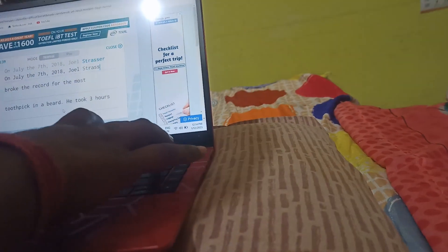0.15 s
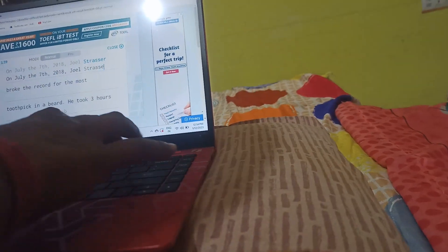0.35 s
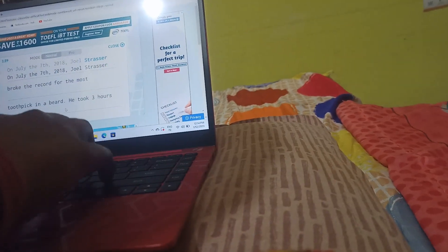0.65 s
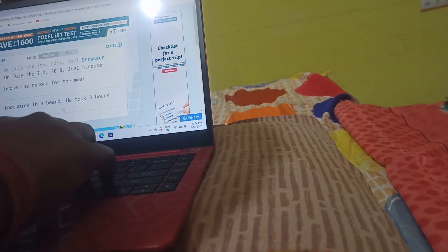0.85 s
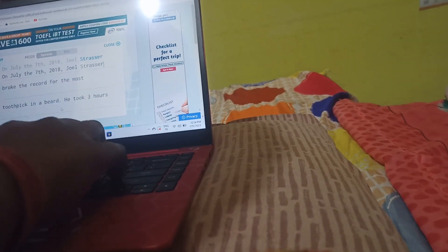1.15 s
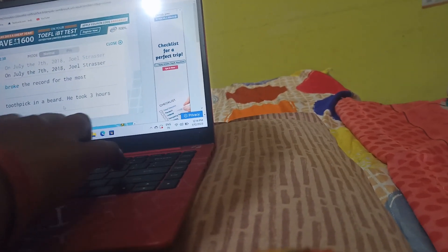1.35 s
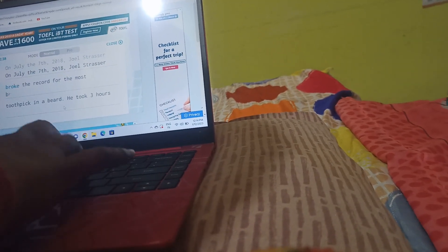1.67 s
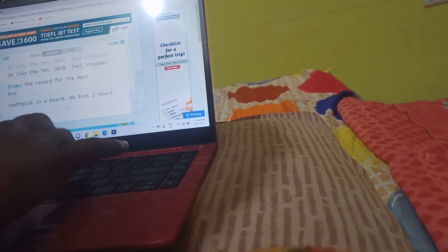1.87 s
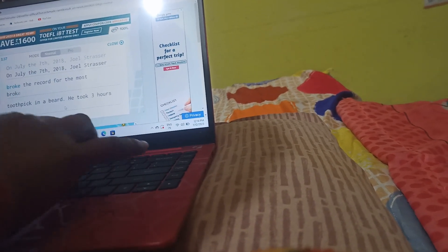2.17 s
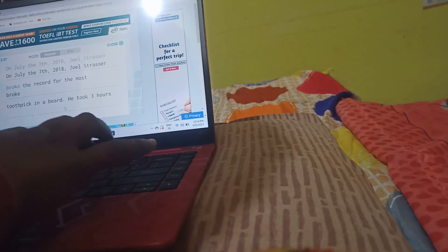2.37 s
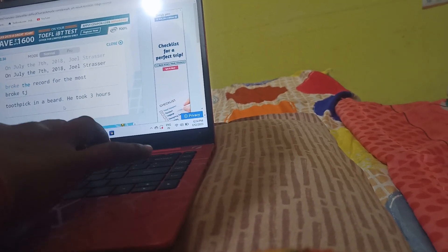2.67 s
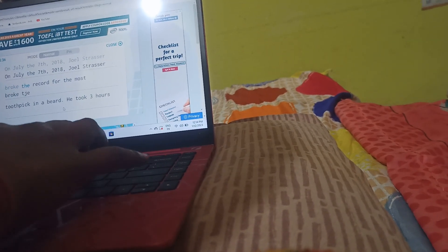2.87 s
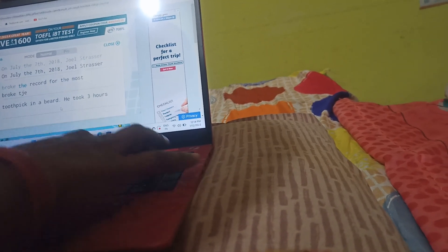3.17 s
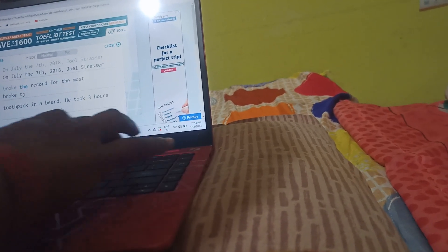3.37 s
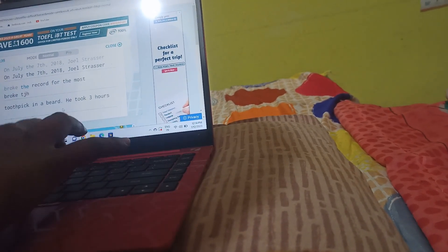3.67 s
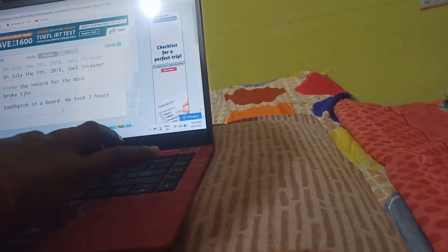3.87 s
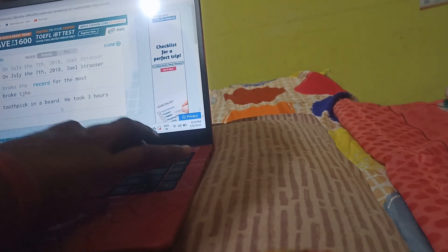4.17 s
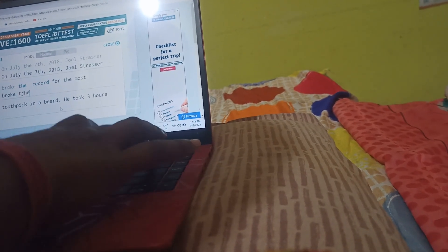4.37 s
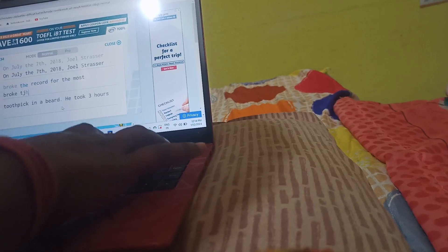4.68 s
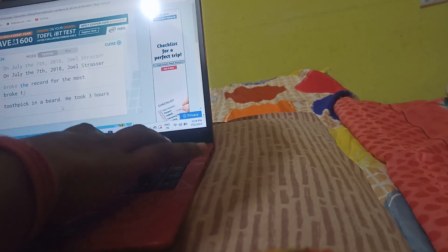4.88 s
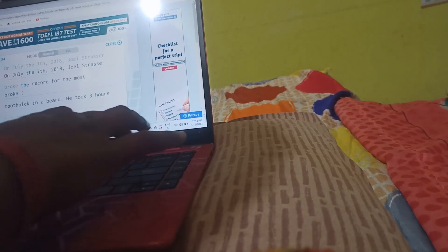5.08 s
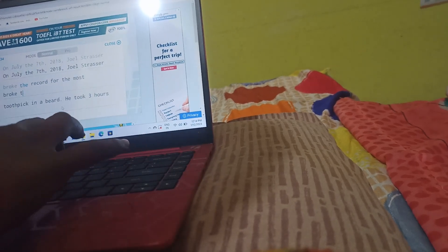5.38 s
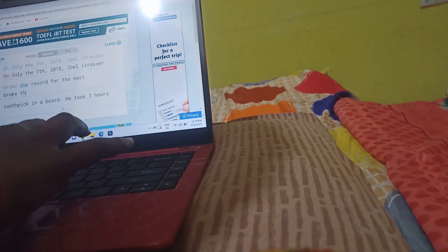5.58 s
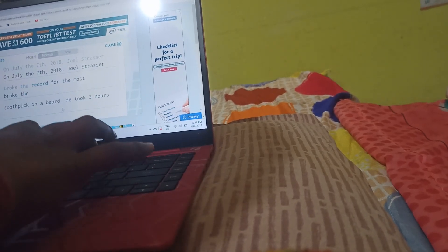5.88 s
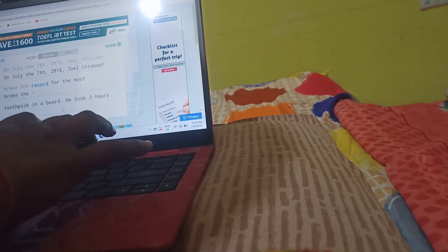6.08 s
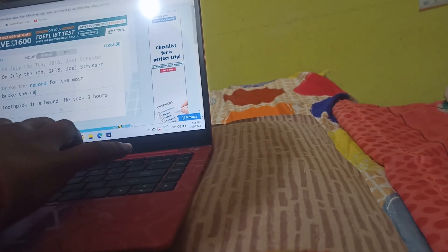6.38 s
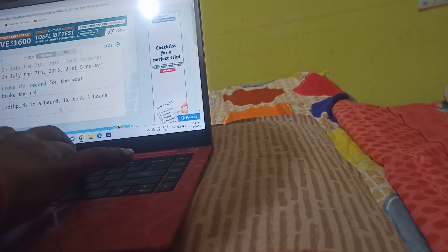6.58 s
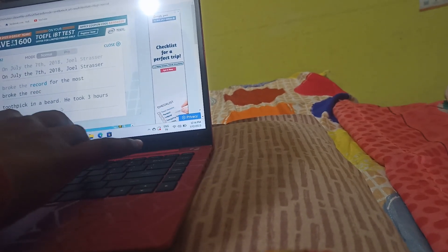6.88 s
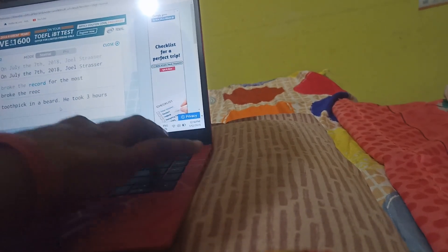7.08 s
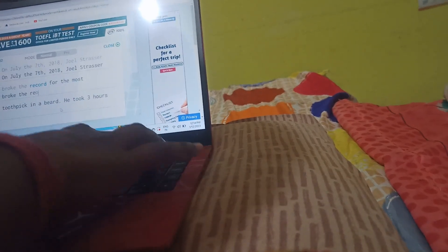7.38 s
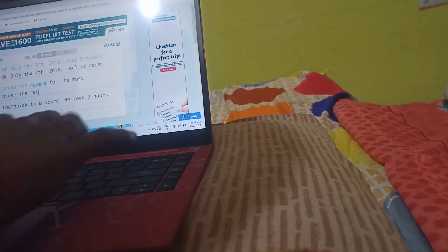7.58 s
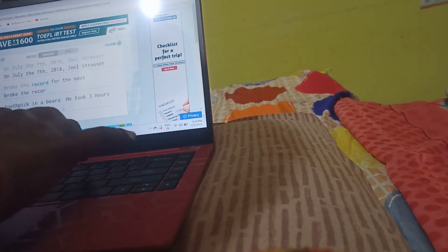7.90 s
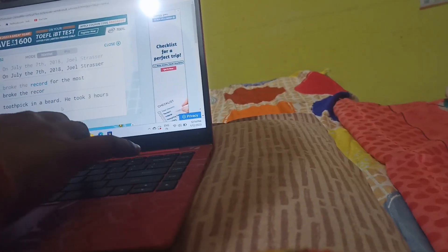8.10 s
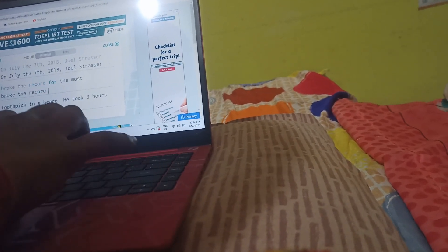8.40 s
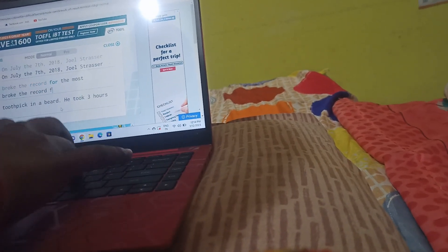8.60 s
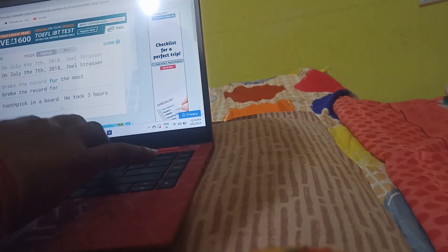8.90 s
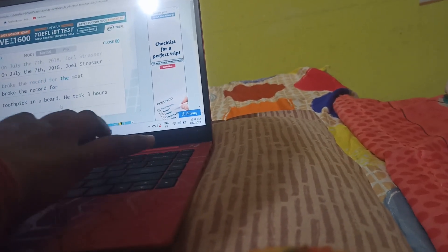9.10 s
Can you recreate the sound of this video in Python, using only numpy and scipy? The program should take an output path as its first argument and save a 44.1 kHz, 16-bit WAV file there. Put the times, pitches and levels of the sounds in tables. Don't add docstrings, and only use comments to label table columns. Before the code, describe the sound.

At 0 s a motor's buzz is just dying away as a key taps. Sparse light clicks near 0.5 s sit in a gated room murmur with a very faint fan tone. At about 0.9 s tiny sharp cracks release a close vibration: a low hum near 210 Hz with brushy, hissing treble, rising quickly, sagging slightly, then cut at 1.9 s and coasting down by 2.2 s with a small catch. Soft laptop keys, plastic click over dull bed thud, cluster at 2.2-2.7 s. The buzz repeats at 2.9-3.9, 4.9-5.9 and 6.9-7.9 s, each with a short run-down; the third start crackles hardest and runs slightly higher. Typing continues under the motor and in the gaps around 4.3-4.7, 6.2-6.7 and 8.1-8.8 s. A last buzz begins at 8.9 s, cut off by the end. Dry, close, nearly mono.

```python
import sys
import numpy as np
from scipy import signal
from scipy.fft import rfft, irfft, next_fast_len
from scipy.io import wavfile
from scipy.ndimage import uniform_filter1d

SR = 44100
rng = np.random.default_rng(int(sys.argv[2]) if len(sys.argv) > 2 else 0)


def volts(x):
    e = np.asarray(x, float) / 20
    return 10 ** e


def wav_out(sig):
    wavfile.write(sys.argv[1], SR, np.round(np.clip(np.atleast_2d(sig).T, -1, 1) * 32767).astype(np.int16))


N = 407925

# f/Hz, level/dB per Hz
ROOM_COLOUR = [(15, -72), (25, -21), (131, -1), (427, -15), (529, -8.5), (691, -15.5), (879, -26.5),
               (1720, -28), (2070, -31), (4150, -33.5), (5570, -33.5), (6900, -46.5), (15000, -41)]
# t/s, share/0-1
GATE_IN_PAUSES = [(0.0, 1), (.13, 0.75), (.5, 0.38), (.8, 0.43), (.9, 0.38), (2.2, 0.76), (2.55, 0.1),
                  (2.78, 0.57), (2.9, 0.26), (4.12, 0.52), (4.3, 0), (4.43, 0.26), (4.52, .75),
                  (4.85, 0.59), (6.25, 0.65), (6.88, 0.28), (8.2, 0.58), (8.9, 0.3)]
# t after power-on/s, share/0-1
GATE_IN_RUNS = [
    (.03, 0.01),
    (.1, 0.93),
    (.22, 0.88),
    (.75, 0.94),
    (1.0, 1.2),
    (1.14, 0.98),
    (1.24, 0.03),
]
# from t/s, to t/s, f/Hz, level/dB
FAN_LINES = [
    (0.0, .85, 1130, -87),
    (0.0, .7, 1700, -86),
    (0.0, .8, 2260, -87),
    (0.1, .8, 3400, -91),
    (.35, .6, 680, -80),
    (4.55, 4.85, 690, -73),
    (4.6, 4.75, 540, -74),
    (4.7, 4.9, 2360, -86),
    (7.6, 8.9, 680, -78),
]
# t/s, peak/dB, thud/dB, bright/dB, tail/dB
KEYS_IN_PAUSES = [(0.003, -37, -7, -5, -12), (0.474, -60.5, -27, -12, -9), (0.583, -62, -9, -23, -7),
                  (2.165, -36.5, 3, -15, -10), (2.315, -49.5, -20, -9, -12), (2.409, -61, 1, -11, -8),
                  (2.54, -52, -18, -16, -13), (2.611, -67, -20, -28, -15), (2.686, -41, 3, -14, -5.5),
                  (4.301, -53.5, -13, -10, -11.5), (4.498, -54.5, -2.5, -6, -29),
                  (4.698, -53, -3, -9.5, -29), (6.222, -73, 15, -16, -17), (6.261, -50.5, 1.5, -17, -11.5),
                  (6.498, -50.5, 2.5, -10.5, -7), (6.601, -48, -9, -12, -15), (6.7, -64.5, 13, -32, -15),
                  (8.144, -45.5, 3.5, -8.5, -8.5), (8.323, -50, 3.5, -12.5, -13),
                  (8.481, -58.5, -3, -10, -10), (8.616, -47, -33, -10.5, -12.5), (8.726, -65, -2, -13, -18),
                  (8.76, -57.5, -5, -9, -8)]
# t/s, peak/dB, thud/dB, bright/dB, tail/dB
KEYS_UNDER_MOTOR = [(1.209, -37.5, -4, -25, -10), (1.542, -38.5, -3, -29, -8),
                    (1.683, -44.5, -8, -25.5, -12), (2.022, -39, -21, -39, -13.5),
                    (3.277, -32.5, -32, -24, -15), (3.629, -40, -8, -28.5, -6),
                    (3.771, -43.5, -1, -31, -13), (3.949, -38, -14, -4, -26), (4.013, -51.5, -13, -20, -5),
                    (5.536, -38, -3.5, -27, -23), (5.715, -51, -19, -26, -19), (5.849, -40, 3, -25, -34),
                    (7.209, -33, -5, -31, -16.5), (7.397, -32.5, -26, -28.5, -11.5),
                    (7.726, -38, -13, -25, -20), (9.04, -34.5, -1, -24, -2.5)]
# f/Hz, level/dB per Hz
KEY_COLOUR = [(150, -22), (250, 1.5), (882, -19.5), (1270, -24), (1590, -21), (1790, -20.5), (5040, -24),
              (7510, -34), (13300, -24.5), (15500, -47)]
# t/s, peak/dB
TOUCHES = [
    (.288, -66),
    (.41, -72),
    (.80, -72),
    (4.477, -74),
]
# power-on t/s, full speed/Hz early, midway and late as the supply sags
STARTS = [
    (-1.103, 214.0, 212.0, 211.0),
    (0.897, 214.8, 211.6, 210.4),
    (2.902, 214.4, 212.7, 211.4),
    (4.899, 219.3, 216.2, 214.3),
    (6.9, 217.4, 215.1, 214.0),
    (8.905, 218.0, 216.0, 215.0),
]
REST_TURNS = [.0, .15, -.12, .5, .33, -0.09]
# t/s, peak/dB
SLIPS = [(0.912, -31.5), (0.9205, -24), (0.9271, -17.5), (0.9485, -30), (2.907, -31), (2.9129, -29.5),
         (2.9177, -29.5), (2.9204, -21), (2.9259, -14.5), (2.929, -29.5), (2.9364, -33), (2.9454, -31.5),
         (4.9122, -16), (4.9177, -18), (4.9212, -20.5), (4.9255, -13), (4.9307, -17), (4.9368, -19),
         (4.9393, -33.5), (6.9086, -39.5), (6.9145, -32.5), (6.92, -36), (6.9226, -26), (6.9277, -16.5),
         (6.9311, -32), (6.9363, -33), (8.9105, -40), (8.923, -29), (8.9302, -33), (8.9384, -19.0)]
# t/s, peak/dB
STOPS = [
    (2.112, -40.5),
    (4.1137, -43.5),
    (6.128, -41),
    (8.1448, -57),
]
# f/Hz, level/dB
CASE = [(300, -22), (1200, -20), (1500, 2), (1900, 7), (2500, 0.1), (3600, -7), (5200, 2), (6800, 0.1),
        (7600, -6), (9000, 0.1), (12000, 2), (16000, -4)]
# f/Hz, level/dB per Hz
HISS = [(900, -26), (1400, -12), (1900, -6), (2600, -15), (3800, -10.5), (5300, -2), (6600, -11.5),
        (7600, -14), (8700, -5.5), (10500, -4.5), (12300, 3), (13800, -2.5), (14400, -2.5), (15800, -8.5)]
# f/Hz, width/Hz, level/dB
TICK_RINGS = [
    (1890, 280, -20),
    (3520, 500, -16),
    (5840, 1700, -1),
    (11500, 5300, -3),
]
TURN_DB = [-48, -48, -49, -46, -46, -35, -27, -37, -45, -40, -27, -33, -41, -34, -39, -46, -39, -40, -37,
           -36, -33, -35, -28, -28, -30, -30, -35, -32, -36, -30, -31, -36, -36, -47, -40, -28, -31, -38,
           -27, -35, -25, -26, -24, -37, -38, -29, -36, -26, -26, -39, -28, -29, -20, -23, -27, -26, -32,
           -23, -32, -23, -30, -33, -24, -39, -41, -44, -33, -37, -36, -37, -48]
# from t/s, to t/s, level/dB
SPLITS = [
    (3.003, 3.22, -45),
    (5.118, 5.178, -41),
    (7.163, 7.192, -42),
    (9.132, 9.172, -44),
]


def evened(x):
    return x / np.sqrt(np.mean(x ** 2) + 1e-20)


def read(points, hz):
    f, value = np.transpose(points)
    return np.interp(np.log(hz + 1), np.log(f + 1), value)


def add(mix, s, sound):
    at = round(s * SR)
    sound = sound[max(-at, 0):]
    part = mix[max(at, 0):][:len(sound)]
    part += sound[:len(part)]


def coloured(x, points, lo_hz, hi_hz):
    size = next_fast_len(len(x))
    hz = np.fft.rfftfreq(size, 1 / SR)
    edges = 1 / np.sqrt((1 + (lo_hz / (hz + 1)) ** 12) * (1 + (hz / hi_hz) ** 12))
    return evened(irfft(rfft(x, size) * volts(read(points, hz)) * edges, size)[:len(x)])


def drift(count, size):
    return evened(uniform_filter1d(uniform_filter1d(rng.standard_normal(count), size), size))


def gate(t):
    runs = sum(np.interp(t - start, *np.transpose(GATE_IN_RUNS)) for start, *_ in STARTS)
    share_per_db, quiet_db, hold_s = 0.0083, -65.5, 0.027
    keys = np.zeros(len(t))
    for s, db, *_ in KEYS_IN_PAUSES + KEYS_UNDER_MOTOR:
        keys += share_per_db * max(db - quiet_db, 0) * (t > s) * np.exp(-abs(t - s) / hold_s)
    return np.maximum(np.interp(t, *np.transpose(GATE_IN_PAUSES)), runs) + uniform_filter1d(keys, size=5)


def room():
    hz, frames, z = signal.stft(rng.standard_normal(N), SR, nperseg=1024)
    patches = uniform_filter1d(rng.standard_normal(z.shape), size=5, axis=0)
    patches = evened(uniform_filter1d(patches, size=4, axis=1))
    noise = signal.istft(z * volts(3.4 * patches), SR, nperseg=1024)[1][:N]
    coarse = np.arange(0, N / SR + .01, .002)
    share = np.interp(np.arange(N) / SR, coarse, gate(coarse))
    layers = (-82, -58, 45, 260), (-87, -67, 260, 900), (-90.5, -68.5, 900, 21000)
    return sum(volts(shut + (wide - shut) * share) * coloured(noise, ROOM_COLOUR, lo, hi)
               for shut, wide, lo, hi in layers)


def fan_line(start, end, hz, db):
    t = np.arange(start, end, 1 / SR)
    tone = np.sin(2 * np.pi * hz * t + 1.4 * drift(len(t), size=1500))
    return start, volts(db + 3.0 * drift(len(t), size=2500)) * tone * signal.windows.tukey(len(t), .3)


def key_snap(db):
    t, peak_s, ring_hz = np.arange(600) / SR, .0009, 5200
    ring = np.sin(2 * np.pi * ring_hz * rng.uniform(0.97, 1.04) * t)
    return volts(db) * (t / peak_s) * np.exp(1 - t / peak_s) * ring


def key_stroke(db, thud_db, bright_db, tail_db):
    t = np.arange(8192) / SR
    click = np.clip(t / 0.0018, 0, 1) * np.exp(-(t / 0.0064) ** 2) + 0.18 * volts(-700 * t)
    rebound = np.exp(-(t - .012) / 0.0037)
    held = 0.57 * np.exp(-t / 0.084) / (1 + (t / 0.077) ** 6)
    tail = np.clip((t - .012) / 0.0024, 0, 1) * (rebound + held)
    noise = rng.standard_normal(len(t))
    clack = coloured(noise, KEY_COLOUR, 340, 6000)
    clack = clack + volts(bright_db) * coloured(noise, KEY_COLOUR, 5700, 15500)
    air = coloured(noise, KEY_COLOUR, 1000, 6200)
    air = air + volts(bright_db + 8.5) * coloured(noise, KEY_COLOUR, 5500, 15500)
    thud = coloured(noise, ROOM_COLOUR, 86, 340) * (t / 0.01) * np.exp(1 - t / 0.0084)
    thud = thud + .5 * np.sin(2 * np.pi * 140 * t) * np.exp(-t / 0.037)
    click_part = (clack + 0.084 * air) * click
    tail_part = volts(tail_db) * (air + 0.52 * clack) * tail
    return volts(db - 9.5) * (click_part + tail_part + volts(thud_db + 4.5) * thud)


def typing(mix):
    for s, db, thud_db, bright_db, tail_db in KEYS_IN_PAUSES + KEYS_UNDER_MOTOR:
        add(mix, s, key_stroke(db, thud_db, bright_db, tail_db))
        add(mix, s, key_snap(db - 5.0 + 0.53 * thud_db))
    for s, db in TOUCHES:
        add(mix, s, key_snap(db))


def slip(db, hz, knock_db, rise_s=.0001):
    t = np.arange(200) / SR
    crack = (t / rise_s) * np.exp(1 - t / rise_s) * np.sin(2 * np.pi * hz * t)
    knock = np.exp(-t / 0.00032) * np.sin(2 * np.pi * 2800 * t)
    return volts(db) * crack + volts(knock_db) * knock


def slips():
    out, rows = np.zeros(N), list(SLIPS)
    for start, *_ in STARTS[1:]:
        rows.append((start + .0015, -46))
        for when, strength in rng.random((5, 2)):
            rows.append((start + 0.013 + 0.064 * when, -43.5 + 8.8 * (strength - .5)))
    for s, db in rows:
        a, b = rng.standard_normal(2)
        hz = 12300 - 300 * abs(a) - 40 * np.clip(-17.5 - db, 0, 15)
        add(out, s - .0002, slip(db, hz, min(-43 + 1.5 * b, db - 12.0)))
    for s, db in STOPS:
        add(out, s - .0002, slip(db - 3.0, 5500, db - 27, rise_s=0.00014))
    return out


def spin(t):
    head_start_s, spin_up_s, on_s, coast_s, friction = .004, .14, 1, .175, 0.27
    coast = (1 + friction) * np.exp(-np.maximum(t - on_s, 0) / coast_s) - friction
    up = (t + head_start_s) / spin_up_s
    return np.tanh(up + .05 * up ** 3) * np.maximum(coast, .07)


def brush_db(share, powered, full_db, up_power, coast_power, cut_db):
    power = coast_power + (up_power - coast_power) * powered
    return full_db + 20 * np.log10(share) * power + cut_db * (1 - powered)


def turn_pattern(angle, hz, powered, middle_hz, phases):
    low, high = np.zeros((2, len(angle)), np.float32)
    coarse = np.arange(0, len(angle), 32)
    turn = step = np.exp(1j * angle).astype(np.complex64)
    for k, (db, phase) in enumerate(zip(TURN_DB, phases), 2):
        turn = turn * step
        change_db = read(CASE, k * hz[coarse]) - read(CASE, k * middle_hz)
        change_db = change_db + .5 * drift(len(coarse), size=40)
        coast_db = -38 + 9.0 * (k % 5 == 0)
        change_db = change_db + .85 * (1 - powered[coarse]) * (k > 6) * (coast_db - db)
        wear_db = .7 * rng.standard_normal()
        height = np.repeat(volts(db + change_db + wear_db).astype(np.float32), 32)[:len(angle)]
        wave = (turn * np.complex64(np.exp(1j * phase))).real
        add(high if k > 35 else low, 0, height * wave)
    return low, high


def brushes(angle, hz, share, powered, middle_hz, phases):
    low, high = turn_pattern(angle, hz, powered, middle_hz, phases)
    clean_low = .984 * (.88 + .12 * powered) * np.clip(share, 0, 1) ** .3
    clean_high = .95 * (.5 + .5 * powered) * np.clip(share, 0, 1) ** 4
    rub = 1 + 0.066 * np.cos(angle) + 0.26 * np.cos(2 * angle + 0.39)
    rub = rub * rng.standard_normal(len(angle))
    low = clean_low * evened(low) + np.sqrt(1 - clean_low ** 2) * coloured(rub, HISS, 1200, 7500)
    high = clean_high * evened(high) + np.sqrt(1 - clean_high ** 2) * coloured(rub, HISS, 7500, 15800)
    low_db = brush_db(share, powered, -45.5, 1.1, 2.5, -3)
    high_db = brush_db(share, powered, -39.0, 1.04, 1.25, -1.5)
    return volts(low_db) * low + volts(high_db) * high


def passes(angle):
    turns = np.floor(angle / (2 * np.pi))
    return np.diff(turns, prepend=turns[0])


def loose_ticks(t, angle, share, powered):
    slow = (1 - np.clip(share, 0, 1) ** 4) ** 2
    ticks = volts(-27) * (passes(angle) + 0.22 * passes(angle - 1.05)) * powered * slow * (t > .04)
    grit = rng.random(len(t)) < 350 / SR
    size = volts(3.0 * np.minimum(rng.exponential(1, len(t)), 3))
    ticks = ticks + volts(-47) * size * grit * (t < .07)
    u = np.arange(400) / SR
    ring = sum(volts(db - 27 * width * u) * np.sin(2 * np.pi * f * u) for f, width, db in TICK_RINGS)
    ring = signal.sosfilt(signal.butter(4, 1500, "high", fs=SR, output="sos"), ring)
    return signal.oaconvolve(ticks, ring)[:len(t)]


def weight_shake(angle, hz, share):
    db = -27.5 + 20 * 1.94 * np.log10(share) - 10 * np.log10(1 + (106.6 / hz) ** 5)
    return np.sqrt(2) * volts(db + .25 * drift(len(angle), size=400)) * np.cos(angle + 2.55)


def motor(start, speeds, rest, phases):
    run_s = 1.285
    t = np.arange(max(0, -start), min(run_s, N / SR - start + .01), 1 / SR)
    share = uniform_filter1d(spin(t), size=500)
    hz = share * uniform_filter1d(np.interp(t, [.45, .75, .95], speeds), size=4000)
    angle = 2 * np.pi * (rest + np.cumsum(hz) / SR + .0006 * drift(len(t), size=300))
    powered = np.clip((1.012 - t) / 0.011, 0, 1)
    sound = weight_shake(angle, hz, share)
    sound = sound + brushes(angle, hz, share, powered, speeds[1], phases)
    sound = sound + loose_ticks(t, angle, share, powered)
    fade = np.clip(np.minimum(t / .012, (run_s + .001 - t) / .02), 0, 1) ** 2
    return start + t[0], fade * sound


def scene():
    mix = room()
    for row in FAN_LINES:
        add(mix, *fan_line(*row))
    typing(mix)
    order = np.arange(len(TURN_DB))
    spread = np.where((order > 18) & (order < 34), .45, 3.0)
    phases = spread * rng.standard_normal(len(order)) - .06 * (order - 24) ** 2
    for (start, *speeds), rest in zip(STARTS, REST_TURNS):
        add(mix, *motor(start, speeds, rest, phases))
    treble_limit = signal.firwin(1023, 15560, window=("kaiser", 8), fs=SR)
    mix = signal.oaconvolve(mix, treble_limit, "same") + slips()
    return np.array([mix, mix])


def low_pass(x):
    return signal.sosfilt(signal.butter(12, 16510, fs=SR, output="sos"), x)


def record(dry):
    side = np.zeros(N)
    for start, end, db in SPLITS:
        size = round((end - start) * SR)
        patchy = volts(db + 2.8 * drift(size, size=400)) * np.hanning(size) ** 0.48
        add(side, start, patchy * coloured(rng.standard_normal(size), HISS, 7600, 15500))
    limit = signal.firwin(255, 16450, window=("kaiser", 5), fs=SR)
    mix = signal.oaconvolve(dry + side * [[1], [-1]], limit[None], "same")
    return low_pass(mix)


dry = scene()
out = record(dry)
wav_out(out)
```